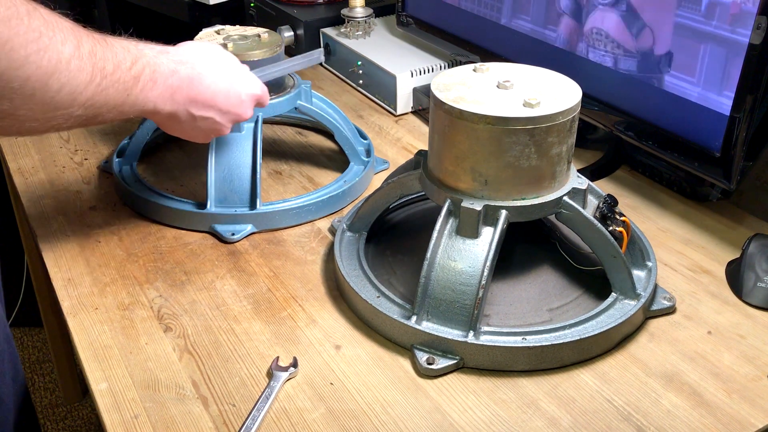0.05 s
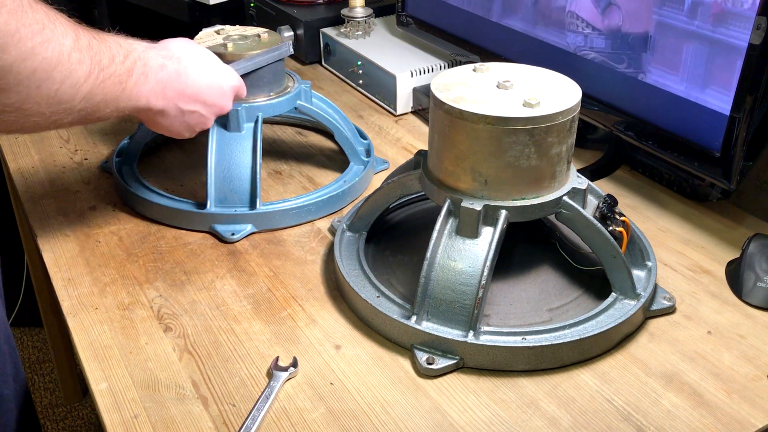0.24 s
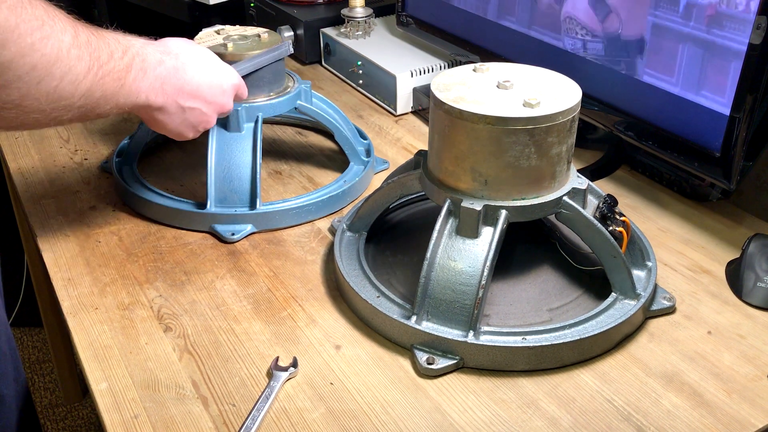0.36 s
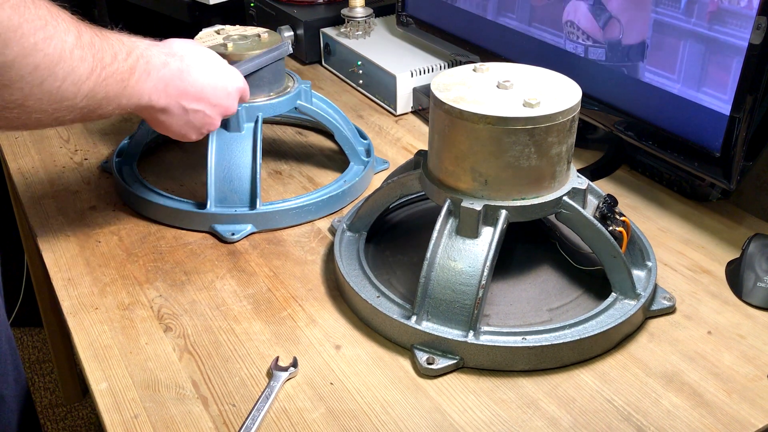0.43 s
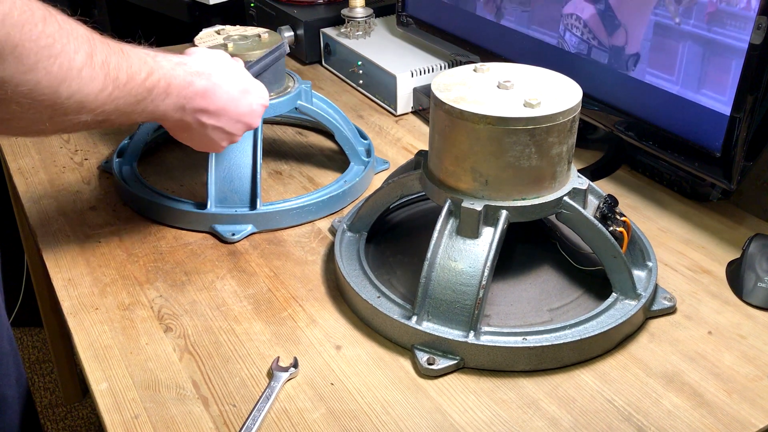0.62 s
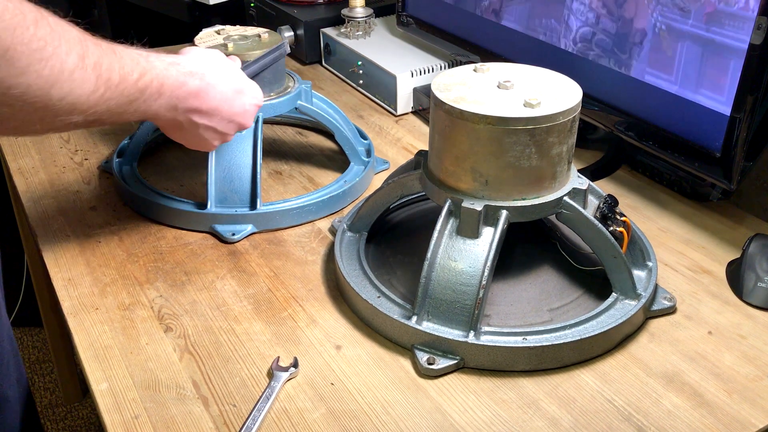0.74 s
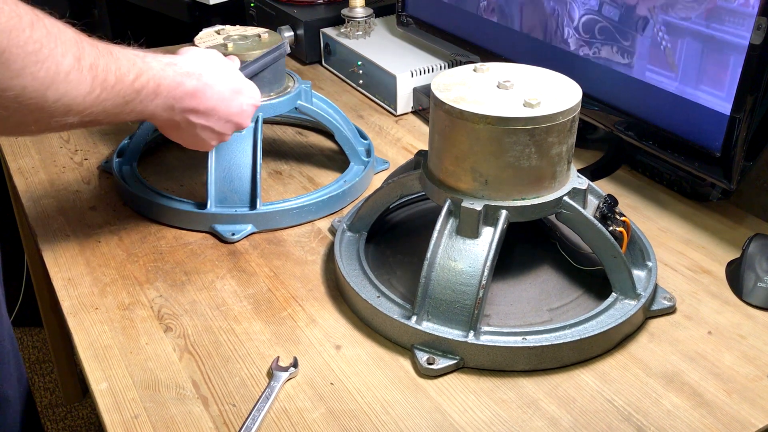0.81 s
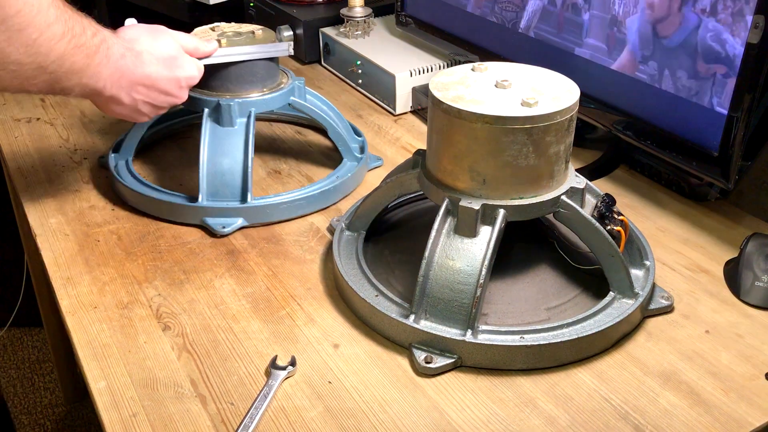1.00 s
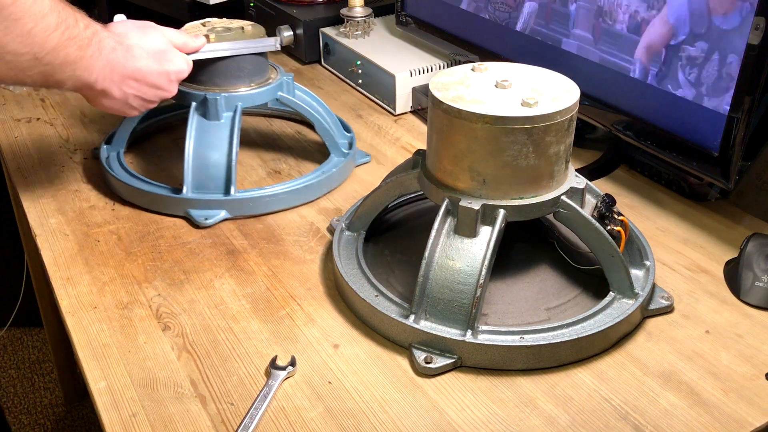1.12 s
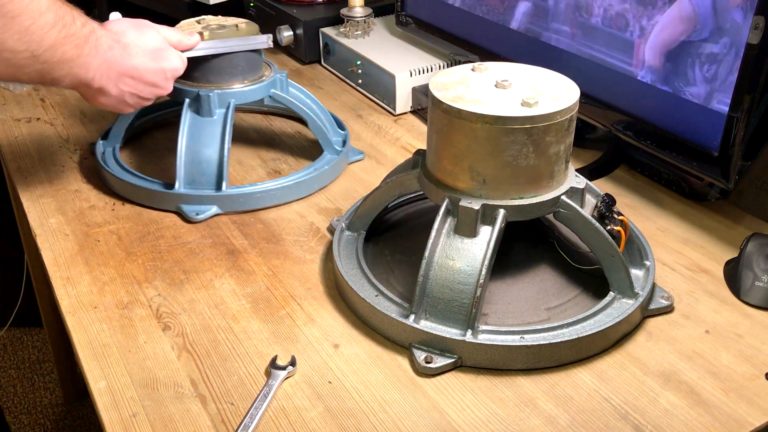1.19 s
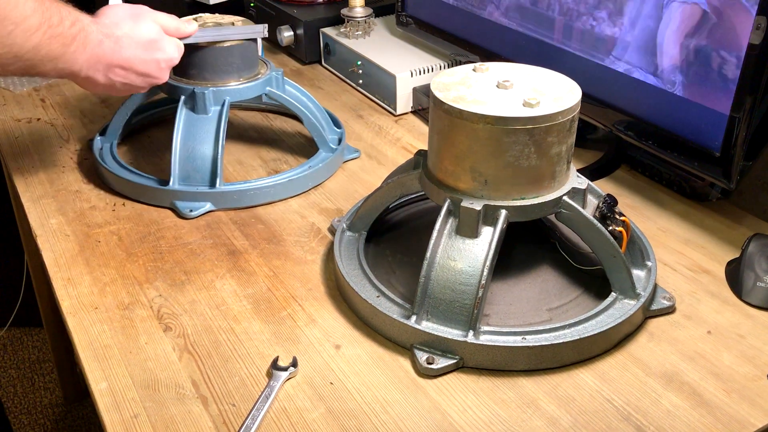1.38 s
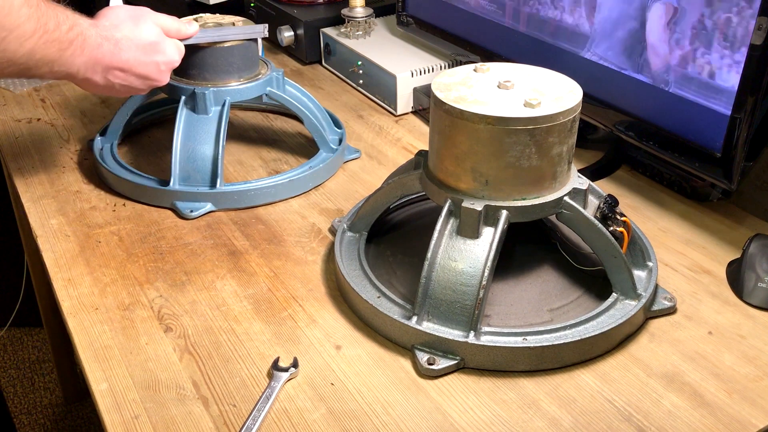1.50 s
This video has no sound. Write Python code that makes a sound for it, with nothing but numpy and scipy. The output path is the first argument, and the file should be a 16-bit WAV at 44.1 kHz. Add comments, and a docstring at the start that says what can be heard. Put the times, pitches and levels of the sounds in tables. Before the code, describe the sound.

A steel tool snaps onto a loudspeaker's magnetic metal back with one loud, bright clack and short ring; later a quiet scraping slide and faint knocks follow, close microphone in a quiet room.

```python
"""A steel tool is snapped by a magnet onto the metal back of a loudspeaker lying on a wooden workbench.
The steel chatters for a few milliseconds: short noise cracks, then fading tones and a noisy room tail.
A faint hiss of shaped noise comes in after the snap and stops abruptly. Later the steel slides once
over the metal: louder shaped noise, with a humming frame. Light knocks, made of short noise bursts,
are heard as it comes off the edge. A quiet room lies below."""
import sys
import numpy as np
from scipy import signal
from scipy.fft import rfft, irfft
from scipy.io import wavfile

SR = 44100
rng = np.random.default_rng(int(sys.argv[2]) if len(sys.argv) > 2 else 0)


def to_wav(s):
    """Save 16-bit WAV."""
    ch = np.atleast_2d(s).T  # columns
    pcm = np.round(np.clip(ch, -1, 1) * 32767)  # PCM
    wavfile.write(sys.argv[1], SR, pcm.astype(np.int16))


N = 68355
T = np.arange(N) / SR  # time of every sample, in seconds
HZ = np.fft.rfftfreq(N, 1 / SR)  # pitch of every spectrum bin

# Quiet room and microphone noise, before its overall level: pitch_hz, level_db (per Hz)
ROOM_COLOUR = [(20, -28.5), (40, -10), (65, -1), (130, -2.5), (170, -9), (220, -4), (300, -12.5),
               (380, -7.5), (480, -14.5), (1300, -20.5), (1600, -21.5), (2000, -25), (4000, -29.5),
               (4900, -33.5), (6200, -32.5), (7600, -36), (9500, -34.5), (10400, -39), (12200, -33.5),
               (15700, -37.5)]
ROOM_DB = -61.5

# Contacts of steel on steel, level against the hardest one: start_s, level_db, tilt_db (per octave)
CONTACTS = [(.2010, -48, 0), (.2030, -43, 0), (.2125, -53.5, -3), (.2150, -48, -3.5), (.2228, -34.5, -2.5),
            (0.2237, 0, 5.5), (.2250, -3, 2), (.2261, -6.5, -0.5), (.2273, -4, -0.5)]
CONTACTS_DB, CONTACT_RISE_S, CONTACT_DECAY_S = 11.5, 0.0001514, 0.0016
TILT_FROM_HZ, CONTACT_LOW_CUT_HZ = 2360, 90
# Broad resonances of the steel that colour every contact: pitch_hz, width_hz, level_db
STEEL_BODY = [(1500, 300, -4.5), (2360, 190, 3.5), (2996, 240, 0), (3580, 330, 3.5), (4600, 440, -2),
              (5580, 170, -7.5), (6700, 260, -1), (8550, 610, -6), (9500, 400, -1), (11300, 660, -2),
              (11666, 460, 3.5), (12840, 280, 0), (13450, 200, -8.5), (14200, 230, -6.5), (14600, 340, -7),
              (15400, 200, -1.5)]
BETWEEN_BODY_DB = -17.5  # lowest level between those resonances

# Long ringing of tool and speaker, before its overall level; close pairs beat:
# pitch_hz, level_db, t60_s (time to fade by 60 dB)
STEEL_TONES = [(1028, -3, .27), (1218, 0, .19), (1413, 6, .26), (1419, -5, .24), (1539, 4.5, .21),
               (1692, 2.5, .31), (1672, -6, .3), (2304, -1, .17), (2577, -1, .16), (2867, -2, .16),
               (3278, -3, .19), (3550, -3, .16), (4215, -8, .21), (4700, -4, .16), (6614, -2, .16),
               (6696, -2, .16), (8724, -5, .16), (9506, -1, .17), (11752, 7, .12), (12760, 0, .13)]
STEEL_TONES_DB, STEEL_TONES_RISE_S = -30.5, 0.014
# Thud of the bench: pitch_hz, level_db, t60_s
BENCH_TONES = [(72, -47, .14), (128, -43, .11), (170, -47, .1), (240, -48, 0.16), (320, -47.5, .09)]

# Crowded high resonances and room together, before their overall level: pitch_hz, level_db (per Hz)
TAIL_COLOUR = [(30, -46), (80, -23), (130, -6.5), (220, -6.5), (330, -18.5), (780, -19.5), (1300, -10.5),
               (1550, -6), (1930, -20), (2250, -5.5), (3500, -4.5), (4000, -9), (5500, -8.5), (6600, -1.5),
               (7500, -9), (9450, -1.5), (10300, -13.5), (11700, -6.5), (12800, -6), (13500, -13.5),
               (15500, -12), (16500, -25.5)]
# How long that tail takes to fade by 60 dB: pitch_hz, t60_s
TAIL_FADE = [(100, .3), (600, 0.32), (1500, 0.28), (3000, 0.26), (7000, 0.22), (11000, .2), (16000, 0.26)]
TAIL_DB, TAIL_RISE_S = -19, 0.002
RIPPLE_DB, RIPPLE_STEP_HZ, RIPPLE_FROM_HZ = 3.2, 18, 1500

# Loudness of the faint hiss after the snap: time_s, level_db
FAINT_HISS_LEVEL = [(.36, -64), (.42, -61), (.50, -62), (.60, -62), (.648, -62), (.658, -81)]
# Loudness of the hiss in the slide: time_s, level_db
SLIDE_LEVEL = [(1.012, -91), (1.018, -53), (1.10, -54.5), (1.17, -53.5), (1.26, -54), (1.31, -57),
               (1.338, -57.5), (1.352, -67), (1.44, -77)]
# Colour of both hisses, before the gentle bass cut: pitch_hz, level_db (per Hz)
HISS_COLOUR = [(300, -2), (600, -2.5), (790, -9.5), (1100, -7.5), (1900, -10.5), (4300, -13.5), (4900, -16),
               (6000, -15), (7700, -16.5), (9500, -16), (10350, -23), (12000, -16), (14500, -23.5),
               (15700, -18)]
HISS_BASS_CUT_HZ = 300
GRAINS_PER_S, GRAIN_SPREAD_DB, GRAIN_SHARE = 5000, 3, 0.4
# Resonances heard in the slide, level at its loudest moment: pitch_hz, width_hz, level_db
SLIDE_RESONANCES = [(577, 27, -66), (970, 150, -64), (1244, 38, -66.5), (1374, 41, -66.5), (1500, 22, -71),
                    (2772, 25, -67.5), (3660, 39, -69), (4250, 85, -68.5), (9180, 70, -70),
                    (9570, 180, -70)]

# Low resonances of frame and bench, before the changes over time: pitch_hz, width_hz, level_db
FRAME_RESONANCES = [(70.56, 4.4, -56), (130.7, 12, -63.5), (158.3, 11, -68), (209.8, 14, -62),
                    (351, 4.3, -65), (415, 7.4, -66)]
# Rise and fall of the frame's hum and rumble: time_s, level_db
FRAME_LEVEL = [(1.01, -25), (1.03, 0), (1.10, 0), (1.16, -0.5), (1.25, -5.5), (1.33, -3), (1.38, -7),
               (1.42, 1.5), (1.50, -2.5), (1.55, -7)]
# Colour of the rumble, before its overall level: pitch_hz, level_db (per Hz)
RUMBLE_COLOUR = [(25, -8), (60, -0.5), (130, 3.5), (280, -11.5), (600, -16.5), (1200, -15), (2000, -34),
                 (5000, -43)]
RUMBLE_DB = -57

# Light knocks at the edge, tick and crack levels against the knock:
# start_s, level_db, body_hz, body_width_hz, tick_hz, tick_db, crack_db, decay_s
EDGE_KNOCKS = [(1.324, -54, 1040, 70, 2700, -7.5, -7, 0.04),
               (1.3381, -54, 1310, 400, 6200, -4.5, 3.5, 0.023),
               (1.3959, -46.5, 920, 500, 4350, -9.5, -10, 0.011),
               (1.404, -45.5, 730, 705, 3620, -16.5, -17, .013)]
TICK_WIDTH_HZ, KNOCK_RISE_S = 900, 0.0012
CRACK_DECAY_S, CRACK_TOP_HZ = 0.0028, 6000

TREBLE_LIMIT_HZ = 15900


def amp(db):
    """Turns decibels into a gain."""
    return 10 ** (np.asarray(db) / 20)


def unit(x):
    """Scales a sound to an average strength (rms) of 1."""
    return x / np.sqrt(np.mean(x ** 2) + 1e-20)


def read(points, hz):
    """Reads a table between its points, with pitch on a log scale."""
    f, value = np.transpose(points)
    return np.interp(np.log(hz + 1), np.log(f + 1), value)


def level(points):
    """Gain over time from (time_s, level_db) points, practically silent outside them."""
    times, decibels = np.transpose(points)
    return amp(np.interp(T, times, decibels, left=-200, right=-200))


def add(mix, start_s, sound):
    """Mixes a sound in at a given time, cutting it off at the end."""
    part = mix[round(start_s * SR):][:len(sound)]
    part += sound[:len(part)]


def noise(gain):
    """Noise of rms 1: the given spectrum with a random phase for every pitch."""
    phase = 2 * np.pi * rng.random(len(HZ))
    return unit(irfft(gain * np.exp(1j * phase), N))


def peak(pitch_hz, width_hz):
    """Spectrum of one resonance; the width is measured at half its height."""
    return 1 / (1 + ((HZ - pitch_hz) / (width_hz / 2)) ** 2)


def resonant_noise(resonances):
    """Sum of narrow noises from (pitch_hz, width_hz, level_db) rows."""
    return sum(amp(db) * noise(peak(hz, width)) for hz, width, db in resonances)


def ring(tones):
    """Sum of fading sine tones from (pitch_hz, level_db, t60_s) rows."""
    out = np.zeros(N)
    for hz, db, t60 in tones:
        fade = np.exp(-np.log(1000) * T / t60)  # a fall by 1000 times is 60 dB
        out += amp(db) * fade * np.sin(2 * np.pi * hz * T)
    return out


def quiet_room():
    """Steady noise of room and microphone, coloured by a table."""
    return amp(ROOM_DB) * noise(amp(read(ROOM_COLOUR, HZ)))


def snap():
    """Steel chatters on steel; each contact cracks, and the hardest sets metal, bench and room ringing."""
    out = np.zeros(N)
    body_power = sum((amp(db) * peak(hz, width)) ** 2 for hz, width, db in STEEL_BODY)
    body = np.sqrt(amp(BETWEEN_BODY_DB) ** 2 + body_power)
    octaves = np.log2(np.maximum(HZ, TILT_FROM_HZ))
    envelope = np.exp(-T / CONTACT_DECAY_S) * np.minimum(T / CONTACT_RISE_S, 1)
    for start_s, db, tilt_db in CONTACTS:
        crack = noise(body * amp(tilt_db * octaves)) * envelope
        # set the total energy of the crack, not its peak
        add(out, start_s, amp(CONTACTS_DB + db) * crack / np.linalg.norm(crack))
    b, a = signal.butter(2, CONTACT_LOW_CUT_HZ, "high", fs=SR)
    out = signal.lfilter(b, a, out)

    hardest_s = max(CONTACTS, key=lambda row: row[1])[0]
    tail_rise = 1 - np.exp(-T / TAIL_RISE_S)
    add(out, hardest_s, tail_rise * (amp(TAIL_DB) * ringing_tail() + ring(BENCH_TONES)))
    tones_rise = 1 - np.exp(-T / STEEL_TONES_RISE_S)
    add(out, hardest_s, tones_rise * amp(STEEL_TONES_DB) * ring(STEEL_TONES))
    return out


def ringing_tail():
    """Crowded resonances of uneven strength, as noise in which each pitch fades at its own speed."""
    knots = np.arange(0, SR / 2, RIPPLE_STEP_HZ)
    ripple = np.interp(HZ, knots, rng.standard_normal(len(knots))) * (HZ > RIPPLE_FROM_HZ)
    steady = noise(amp(read(TAIL_COLOUR, HZ) + RIPPLE_DB * ripple))
    # split into short slices of time and pitch, fade them, and join them again
    hz, t, slices = signal.stft(steady, SR, nperseg=256)
    fade = np.exp(-np.log(1000) * t / read(TAIL_FADE, hz)[:, None])
    return signal.istft(slices * fade, SR, nperseg=256)[1][:N]


def faint_hiss_and_slide():
    """Grainy noise is heard as a faint hiss, then as steel sliding on steel with narrow resonances."""
    happens = rng.random(N) < GRAINS_PER_S / SR
    boost_db = GRAIN_SPREAD_DB * np.minimum(rng.exponential(1, N), 4)
    grains = happens * rng.standard_normal(N) * amp(boost_db)
    grainy = GRAIN_SHARE * unit(grains) + rng.standard_normal(N)
    bass_cut = HZ / (HZ + HISS_BASS_CUT_HZ)
    hiss = unit(irfft(rfft(grainy) * amp(read(HISS_COLOUR, HZ)) * bass_cut, N))

    slide = level(SLIDE_LEVEL)
    resonances = resonant_noise(SLIDE_RESONANCES) * slide / slide.max()
    return hiss * (level(FAINT_HISS_LEVEL) + slide) + resonances


def frame():
    """The dragged speaker frame hums (narrow noises) and rumbles (broad low noise) on the bench."""
    hum = resonant_noise(FRAME_RESONANCES)
    rumble = amp(RUMBLE_DB) * noise(amp(read(RUMBLE_COLOUR, HZ)))
    return level(FRAME_LEVEL) * (hum + rumble)


def knocks():
    """The tool bumps over the edge: a short noisy crack and a damped body note with a tick on top."""
    out = np.zeros(N)
    crack_colour = 1 / np.hypot(1, HZ / CRACK_TOP_HZ)  # the treble falls away gently
    for start_s, db, body_hz, width_hz, tick_hz, tick_db, crack_db, decay_s in EDGE_KNOCKS:
        tick = amp(tick_db) * noise(peak(tick_hz, TICK_WIDTH_HZ))
        note = noise(peak(body_hz, width_hz)) + tick
        note *= np.minimum(T / KNOCK_RISE_S, 1) * np.exp(-T / decay_s)
        crack = amp(crack_db) * noise(crack_colour) * np.exp(-T / CRACK_DECAY_S)
        add(out, start_s, amp(db) * (crack + note))
    return out


def scene():
    """All sources added together, as one channel."""
    return (quiet_room() + snap() + faint_hiss_and_slide() + frame() + knocks())[None]


def record(dry):
    """Rounds off the loudest peaks (soft overload), then removes the highest treble."""
    lowpass = signal.firwin(401, TREBLE_LIMIT_HZ, window=("kaiser", 9), fs=SR)
    return signal.oaconvolve(np.tanh(dry), lowpass[None], "same")


dry = scene()
out = record(dry)
to_wav(out)
```